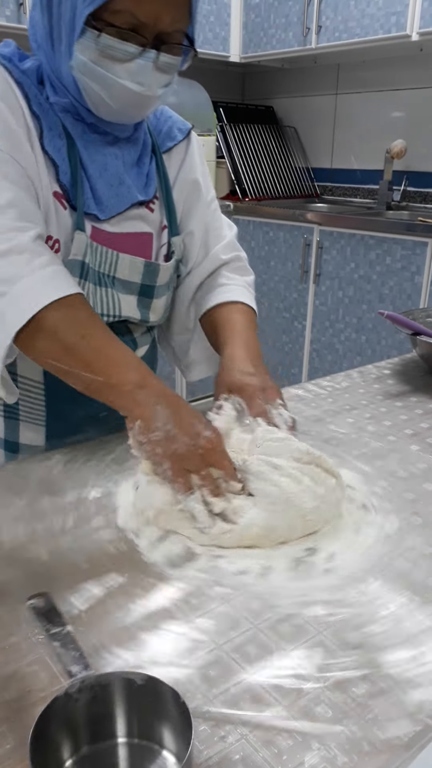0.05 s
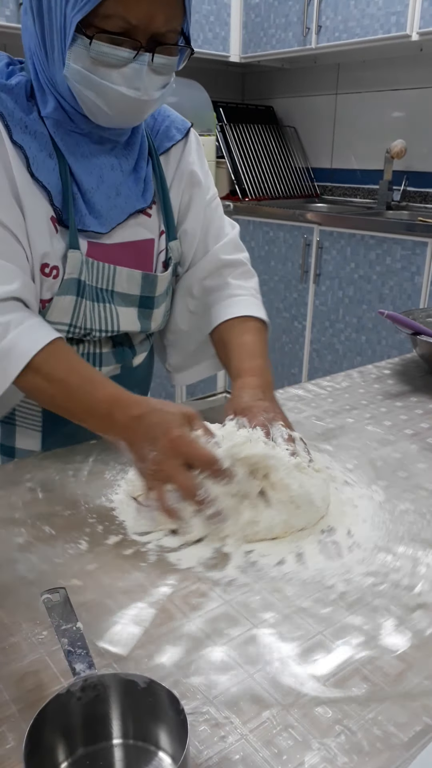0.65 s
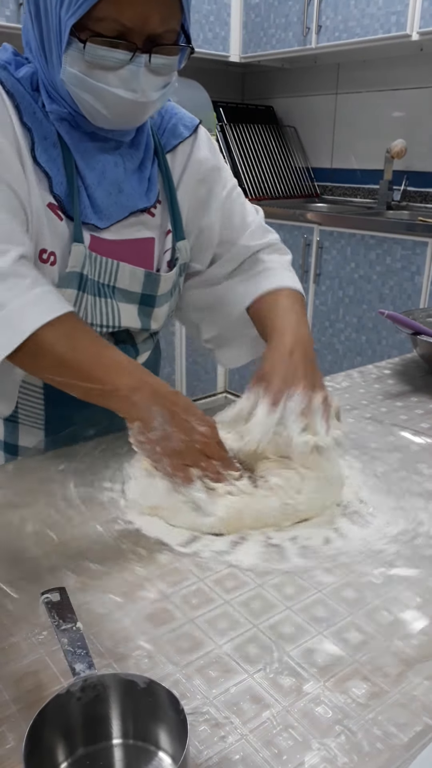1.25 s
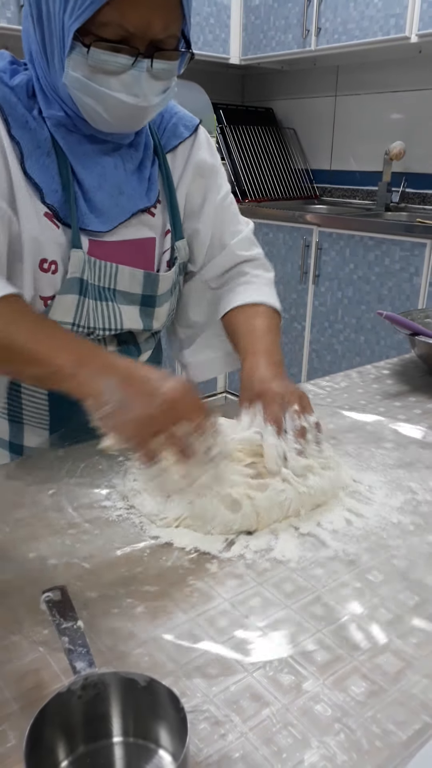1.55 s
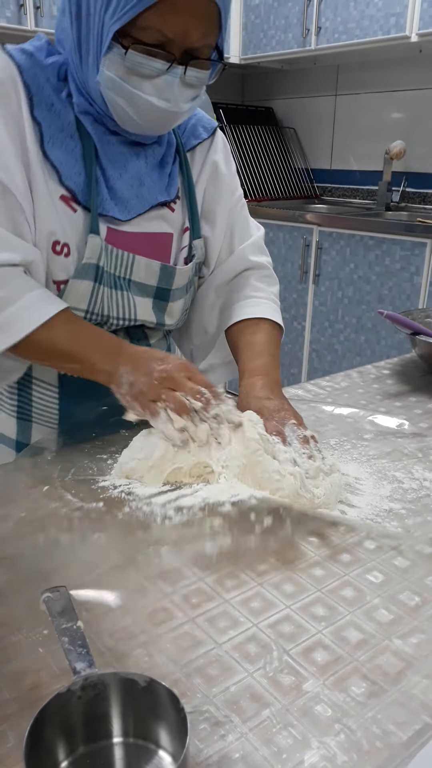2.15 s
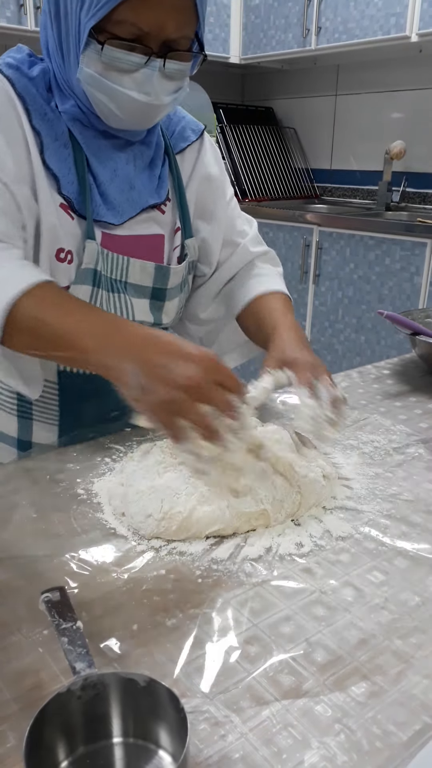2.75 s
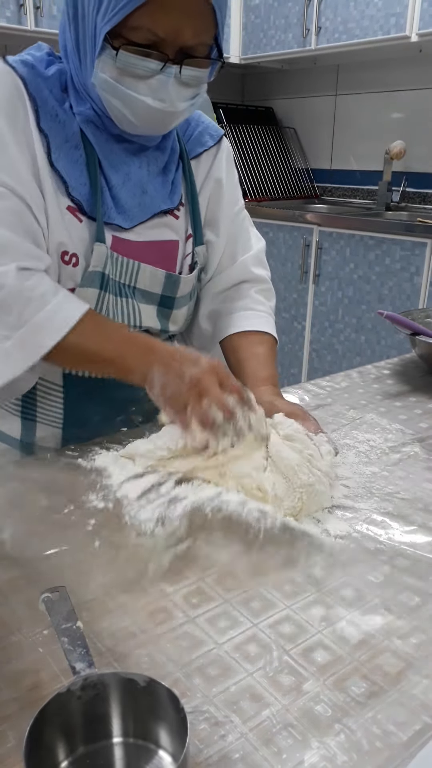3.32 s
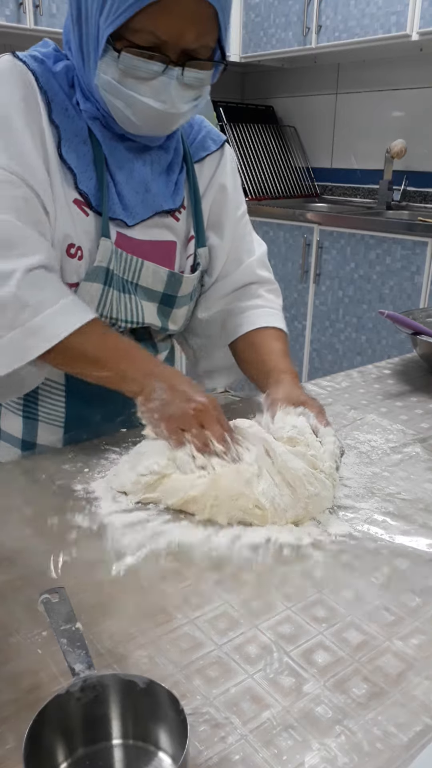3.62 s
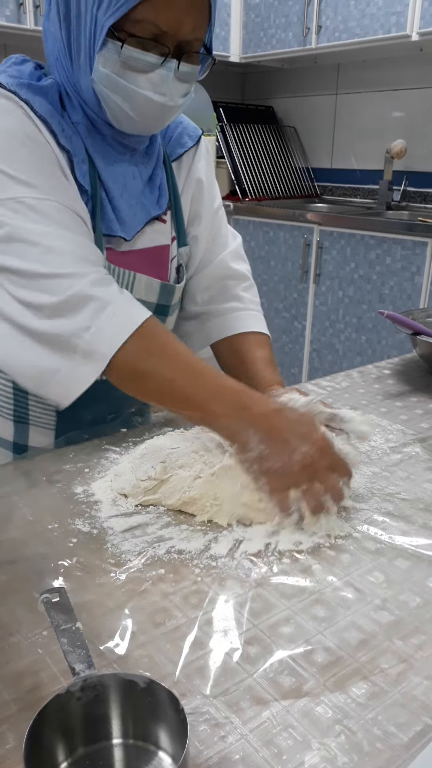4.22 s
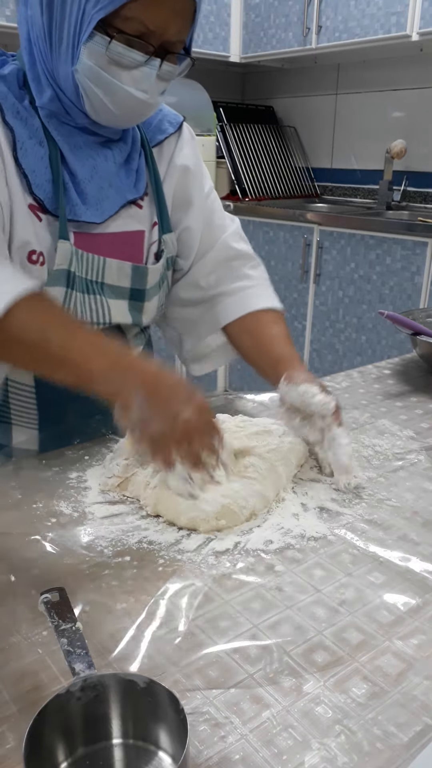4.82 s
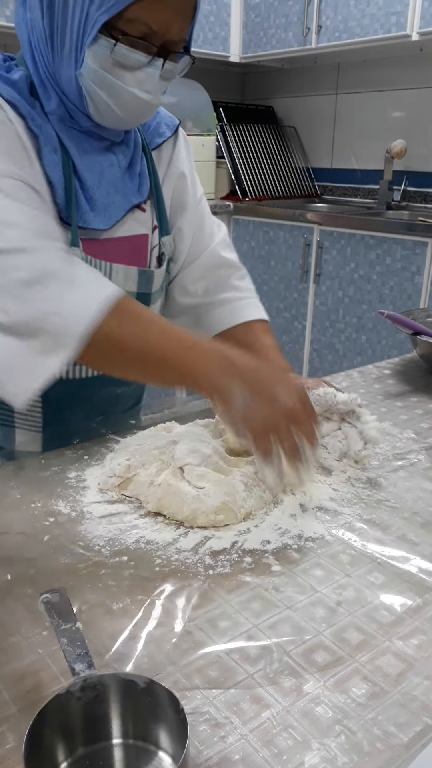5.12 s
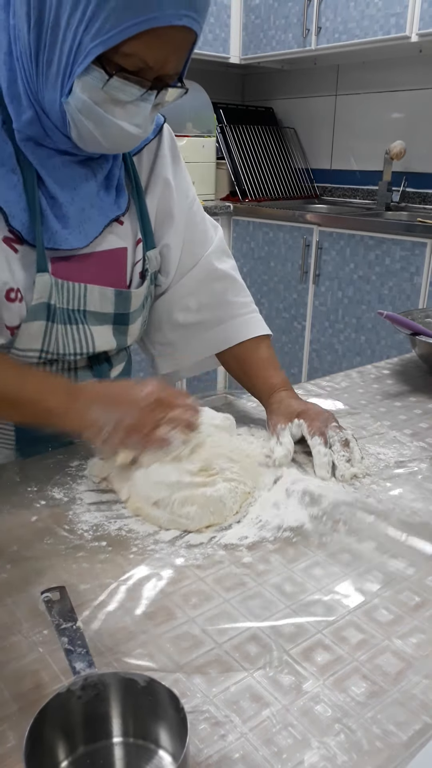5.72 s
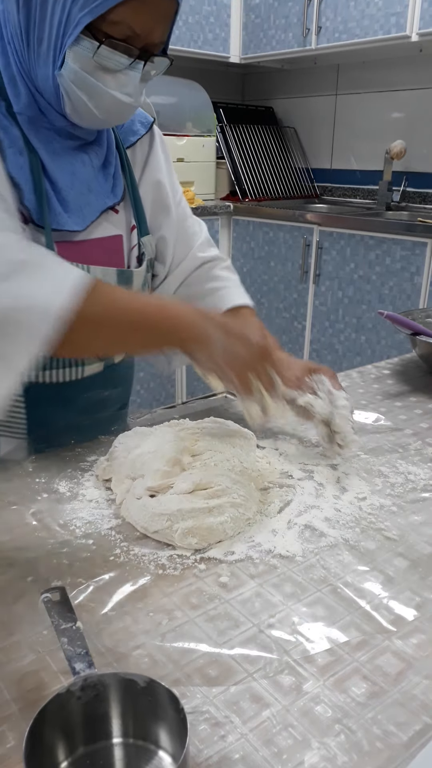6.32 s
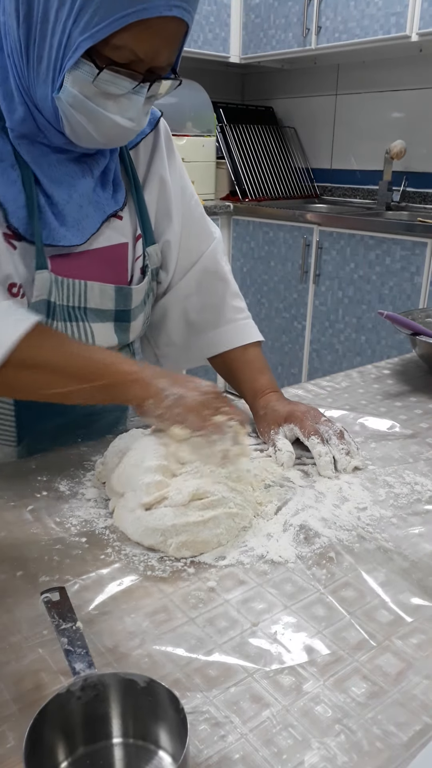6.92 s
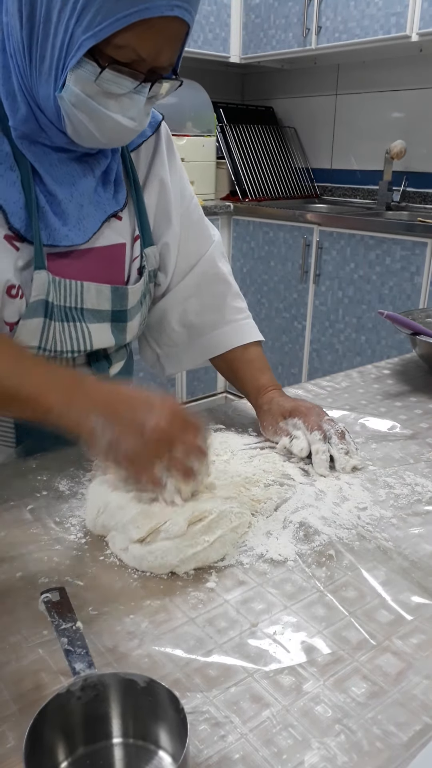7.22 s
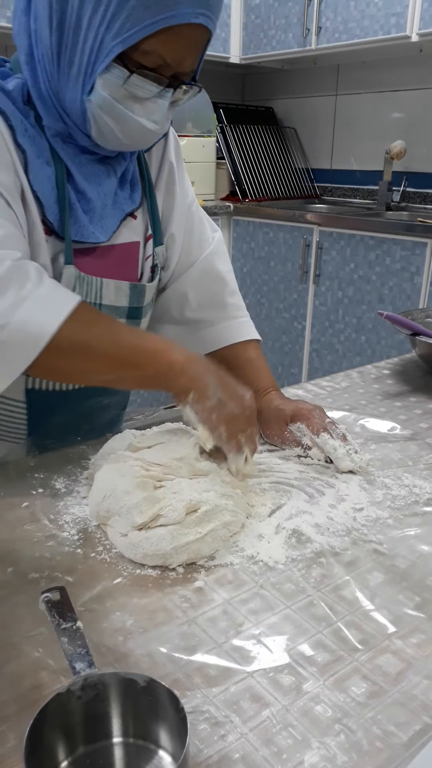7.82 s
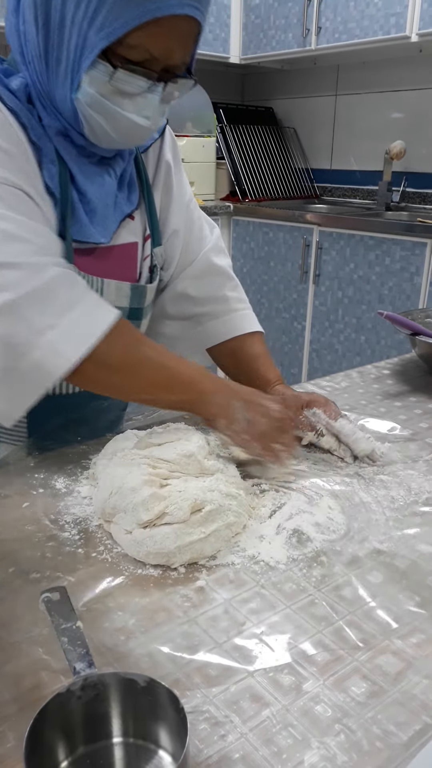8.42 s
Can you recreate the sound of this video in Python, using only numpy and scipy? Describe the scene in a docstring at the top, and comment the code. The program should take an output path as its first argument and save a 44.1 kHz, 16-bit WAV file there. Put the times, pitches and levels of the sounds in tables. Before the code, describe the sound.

Hands knead dough on a floured, plastic-covered table with soft thuds, hissing flour and occasional snaps, over a faint appliance hum.

```python
"""First come soft thuds and a hiss of flour: hands are kneading dough on a table in a tiled kitchen.
Palms and dough make the table boom, flour grains slip under the hands, and the dough bumps as it rolls.
An appliance hums behind it all. Skin sticks and slips on a loose plastic cover with short groans,
the sticky dough tears with tiny ticks, and now and then the cover lifts and snaps back."""
import sys
import numpy as np
from scipy import signal
from scipy.fft import rfft, irfft
from scipy.io import wavfile
from scipy.ndimage import uniform_filter1d

SR = 44100
rng = np.random.default_rng(int(sys.argv[2]) if len(sys.argv) > 2 else 0)


def persist_wave(psi):
    """Save psi, clipped to +-1, as 16-bit WAV."""
    counts = np.round(np.clip(psi, -1, 1) * 32767).astype(np.int16)
    wavfile.write(sys.argv[1], SR, np.atleast_2d(counts).T)


N = 377496
TIME = np.arange(N) / SR

# hand and dough landing: start_s, level_db, weight_db (bass), hardness_db (treble), spot_boom_hz
LANDINGS = [(0.001, -30, -13, -24, 118), (0.015, -22, -15.5, -23.5, 236), (0.159, -29, -18, -26, 208),
            (0.194, -30, -17.5, -27, 232), (1.036, -37, -21, -30, 320), (1.106, -35.5, -20, -34, 238),
            (1.775, -36, -14, -23, 89), (2.382, -33, -20, -35, 243), (2.42, -32.5, -22, -43, 236),
            (3.015, -26.5, -11.5, -33, 154), (4.148, -23.5, -18.5, -38, 258), (4.835, -36, -14, -28, 205),
            (5.153, -37, -21, -35, 320), (5.203, -21, -16.5, -37, 187), (5.507, -37.5, -27, -32, 325),
            (5.909, -32, -16, -30, 172), (7.592, -27.5, -14.5, -41, 171), (7.627, -34.5, -19, -25, 172),
            (7.853, -42, -28, -27, 240), (8.083, -28.5, -16.5, -31, 298)]
# how the covered table top answers a blow: frequency_hz, level_db
TABLE_TOP = [(25, -39), (60, -27.5), (150, -10.5), (230, -1), (350, -6), (490, 0.5), (630, 0), (740, -10),
             (860, -12), (1030, -21.5), (1320, -13), (2000, -24.5), (4000, -31.5), (16000, -46)]
# the low notes the table rings at: pitch_hz, level_db, fade_s (time to fall by 60 dB)
TABLE_NOTES = [(88, -1.5, 0.14), (118, 3, 0.094), (147.8, -1, 0.28), (167, 1.5, 0.053), (201.4, 3.5, 0.19),
               (240, 10.5, 0.07), (308.3, -3, 0.23), (529, 2, 0.1)]
# a hand sweeping over the flour: fastest_s, length_s, hiss_db, pressure_db (rasp compared with hiss)
HAND_SWEEPS = [(0.098, 0.31, -55, 1), (0.71, 0.23, -62, -2), (.805, 0.22, -63.5, -2),
               (0.982, 0.2, -66, -0.5), (1.295, 0.34, -59.5, 1), (1.6, 0.35, -63.5, 1.5),
               (1.864, 0.28, -64, -12), (2.084, 0.22, -68, 5), (2.52, 0.3, -56.5, 2),
               (3.12, 0.23, -65.5, -8), (3.284, 0.15, -66, 8), (4.37, 0.13, -69, 5),
               (4.613, 0.32, -71.5, 2), (4.883, 0.11, -76, 9), (5.37, 0.54, -66, 1),
               (5.833, 0.38, -73.5, 3), (5.967, 0.42, -66.5, 2), (6.628, 0.24, -65, 2),
               (6.855, .26, -70.5, 3.5), (7.665, 0.24, -64, -12), (8.232, 0.33, -57, -3)]
# a hand or the cover skidding to a stop: start_s, hiss_db, fade_s, pressure_db
SKIDS = [(0.0, -50.5, 0.15, 3), (1.785, -63.5, 0.34, 5), (2.204, -63, 0.33, 9.5), (3.014, -62.5, 0.5, 5.5),
         (3.397, -75, 0.59, 24.5), (3.712, -65, 0.17, 12), (4.141, -60.5, 0.68, 7),
         (5.201, -62.5, 0.13, 14.5), (6.505, -64.5, 0.35, 0), (7.592, -62, 0.68, 5.5),
         (8.08, -61.5, 0.3, 1), (8.292, -65, 0.33, 14), (8.359, -50, 0.46, 7.5)]
# the hiss of sliding flour: frequency_hz, level_db
FLOUR_HISS = [(1000, -18), (2500, 2.5), (3300, -2.5), (4200, -5.5), (4900, -2.5), (5900, -6), (6800, -3.5),
              (7600, -7.5), (8600, -3.5), (9800, -11), (13000, -12), (16000, -17.5)]
# the coarser rasp on the plastic: frequency_hz, level_db
PLASTIC_RASP = [(500, -2.5), (1000, -2), (1350, 12.5), (1750, 12), (2150, 8.5), (2700, -2), (3800, -3.5),
                (6000, -40)]
# palms leaning into the dough: hardest_s, length_s, level_db
PALM_PRESSES = [(0.123, 0.45, -49.5), (0.717, 0.5, -61.5), (1.4, 2.8, -61), (2.44, 0.67, -52.5),
                (3.31, 0.23, -54), (4.34, 0.59, -60), (4.88, 0.23, -54), (5.296, 0.46, -52.5),
                (5.735, .1, -51.5), (5.98, .12, -56.5), (6.606, 0.12, -41.5), (7.66, 0.23, -50),
                (8.362, 0.6, -48)]
# the appliance's dull rush of air: frequency_hz, level_db
AIR_RUSH = [(25, -28), (50, -21), (85, -7.5), (125, -12), (155, 0.5), (380, -3.5), (590, -3), (700, -7.5),
            (790, -16.5), (1050, -22.5), (1310, -13.5), (1500, -20), (2200, -26), (3200, -28)]
# its weaker whines: pitch_hz, width_hz, level_db
WEAK_WHINES = [(1294, 37, -73), (2416, 76, -79.5), (2663, 21, -79), (3830, 86, -84.5)]
# its strongest whine swelling: loudest_s, length_s, level_db
MAIN_WHINE_SWELLS = [(.5, 0.22, -71), (2.9, .3, -69), (5.92, 0.57, -69.5), (6.82, 0.4, -70.5)]
# faint background hiss, the same in both ears: frequency_hz, level_db
CENTRE_HISS = [(2500, -19), (3600, -1), (4400, -2.5), (6000, -4), (10000, -8.5), (13000, -3), (16000, -5)]
# background noise that differs between the ears: frequency_hz, level_db
SIDE_NOISE = [(25, 5), (200, -5.5), (700, 0.5), (2500, 1), (5000, 1), (9000, -10.5), (12000, -1.5),
              (15000, -1.5)]
# skin and dough sticking and slipping on the plastic: start_s, length_s, slip_rate_hz, level_db
STICKY_SLIPS = [(.163, 0.016, 367, -36.5), (.196, 0.031, 470, -40.5), (2.21, 0.013, 505, -31.5),
                (6.602, .014, 603, -35.5), (6.631, 0.02, 550, -45.5), (7.636, 0.0236, 480, -41),
                (8.09, 0.028, 490, -42.5), (8.175, 0.064, 478, -40.5)]
# sticky ticks of dough and skin: start_s, level_db, centre_hz
DOUGH_TEARS = [(1.2727, -39, 7600), (1.799, -45, 5230), (2.207, -48, 4940), (3.022, -41.5, 5960),
               (3.7116, -45.5, 4970), (4.135, -57, 6300), (4.175, -46, 4850), (4.357, -54, 6000),
               (5.21, -36, 6200), (6.4981, -59, 6500), (7.6004, -47.5, 6940), (8.085, -48, 6800),
               (8.3548, -37, 5850), (8.362, -38, 4200), (8.379, -42, 3720)]
# the cover's snaps and two of their hard echoes from the room: start_s, level_db, crispness_db (treble)
SNAPS_AND_ECHOES = [(2.048, -33.5, -15.5), (2.207, -28.5, -7.5), (3.26, -32.5, -15), (3.398, -15, -16),
                    (3.448, -33, -17), (3.497, -20, -25), (3.614, -35.5, -23), (6.567, -43, -29),
                    (6.602, -36, -27), (8.293, -31.5, -5), (8.355, -23.5, -4), (8.363, -26, 3),
                    (8.374, -38, -11), (8.381, -33, -29)]
# the hollow knock of the cover: frequency_hz, level_db
COVER_KNOCK = [(40, -59), (150, -11.5), (350, -9.5), (490, 4), (620, 8), (740, 3.5), (880, -5),
               (1020, -14.5), (1300, -2), (1900, -15.5), (2700, -22), (4000, -41), (8000, -58),
               (16000, -66)]
# tiny air pockets popping in the dough: start_s, level_db, pitch_hz
AIR_POCKETS = [(3.7116, -44.5, 2570), (4.1753, -42.5, 2540), (5.216, -45, 2370)]
# first echoes from the table and the tiled walls: delay_s, relative_gain
FIRST_ECHOES = [(.0074, 0.23), (.0092, 0.29), (.0128, 0.11), (.0195, 0.051), (.0503, 0.15)]
# how long the kitchen rings: frequency_hz, fade_s (time to fall by 60 dB)
ROOM_FADE = [(100, 0.46), (600, 0.35), (2000, 0.54), (6000, 0.65), (15000, 0.11)]


def amp(db):
    """Turns decibels into a gain to multiply by."""
    return 10 ** (np.asarray(db) / 20)


def unit(x):
    """Scales a signal to an average strength (rms) of 1."""
    return x / np.sqrt(np.mean(x ** 2) + 1e-20)


def read(points, hz):
    """Looks up a frequency in a table, blending between rows on a log scale."""
    row_hz, value = np.transpose(points)
    return np.interp(np.log(hz + 1), np.log(row_hz + 1), value)


def add(mix, s, sound):
    """Mixes a sound in at s seconds."""
    part = mix[max(round(s * SR), 0):][:len(sound)]
    part += sound[:len(part)]


def colour(x, spectrum):
    """Shapes the lows and highs of a steady signal by a table, at strength 1."""
    return unit(irfft(rfft(x) * amp(read(spectrum, np.fft.rfftfreq(N, 1 / SR))), N))


def pulse(shape_db, travel_s=0, size=4096):
    """A click with the spectrum shape_db(hz); travel_s is its delay at 500 Hz through a plate."""
    hz = np.fft.rfftfreq(size, 1 / SR)
    level_db = shape_db(abs(np.fft.fftfreq(size, 1 / SR)))
    log_gain = np.log(amp(np.maximum(level_db, -100)))
    spectrum = np.exp(np.conj(signal.hilbert(log_gain)))[:len(hz)]  # nothing sounds before the hit
    bending = np.exp(-4j * np.pi * travel_s * np.sqrt(500 * hz))  # treble travels faster than bass
    click = irfft(spectrum * bending)[:size // 2]
    return click / abs(click).max()


def blow(body, treble_db, bass_db, travel_s=0):
    """One hit on an object: short contact lifts the treble, a heavy mass the bass."""
    tilt = [(200, bass_db), (480, 0), (720, 0.0091), (1400, treble_db), (4000, 1.9 * treble_db)]
    return pulse(lambda hz: read(body, hz) + read(tilt, hz), travel_s)


def grains(per_s, spread_db):
    """Random clicks of uneven size, at strength 1."""
    size = amp(spread_db * np.minimum(rng.exponential(1, N), 4))
    return unit(size * rng.choice([-1, 1], N) * (rng.random(N) < per_s / SR))


def arch(s, length_s, end_drop_db=16, rise_share=0.47, roundness=1.48):
    """A gain that rises to 1 at time s and falls again."""
    away = np.maximum((s - TIME) / rise_share, (TIME - s) / (1 - rise_share)) / length_s
    near, gain = away < 4, np.zeros(N)
    gain[near] = amp(-end_drop_db * away[near] ** roundness)
    return gain


def skid(s, fade_s, attack_s=0.0038):
    """The gain of a sudden touch at time s that slows to a stop."""
    t, gain = np.arange(SR) / SR, np.zeros(N)
    add(gain, s, np.minimum(t / attack_s, 1) * np.exp(-np.log(1000) * t / fade_s))
    return gain


def swelling(rows, resting_db):
    """A resting gain that swells once for each row of a table."""
    swell_power = sum((amp(db) * arch(s, length_s)) ** 2 for s, length_s, db in rows)
    return np.sqrt(amp(resting_db) ** 2 + swell_power)


def table_thuds(ring_db=-12, off_spot_db=-11, spot_octaves=0.37, contact_s=0.0028):
    """Soft, heavy landings ring the table, most of all at the notes of the spot that is hit."""
    usual_weight_db, usual_hardness_db = -15, -22
    out, t = np.zeros(N), np.arange(SR // 2) / SR
    notes = np.array([(-1) ** k * amp(db - 60 * t / fade_s) * np.sin(2 * np.pi * hz * t)
                      for k, (hz, db, fade_s) in enumerate(TABLE_NOTES)])
    notes *= 1 - np.exp(-t / contact_s)  # soft dough builds its force slowly
    note_hz = np.array(TABLE_NOTES)[:, 0]
    for s, db, weight_db, hardness_db, spot_hz in LANDINGS:
        bass_db = weight_db - usual_weight_db
        near = np.exp(-(np.log2(note_hz / spot_hz) / spot_octaves) ** 2)
        ring = amp(off_spot_db * (1 - near)) @ notes
        knock = blow(TABLE_TOP, hardness_db - usual_hardness_db, bass_db, travel_s=0.001865)
        add(out, s, amp(db) * knock)
        add(out, s, amp(db + ring_db + min(bass_db, 2)) * ring)  # heavier rings louder, up to a limit
    return out


def sliding_flour(resting_hiss_db=-80, resting_rasp_db=-75):
    """Countless flour grains slip under the hands; pressure adds a coarser rasp on the plastic."""
    moves = [(amp(db) * arch(s, length_s), pressure_db) for s, length_s, db, pressure_db in HAND_SWEEPS]
    moves += [(amp(db) * skid(s, fade_s), pressure_db) for s, db, fade_s, pressure_db in SKIDS]
    hiss_power = amp(resting_hiss_db) ** 2 + sum(gain ** 2 for gain, _ in moves)
    rasp_power = amp(resting_rasp_db) ** 2 + sum((gain * amp(db)) ** 2 for gain, db in moves)
    hiss = colour(grains(per_s=7600, spread_db=2.5), FLOUR_HISS)
    rasp = colour(grains(per_s=1900, spread_db=3), PLASTIC_RASP)
    return np.sqrt(hiss_power) * hiss + np.sqrt(rasp_power) * rasp


def rolling_dough():
    """Many small soft bumps as the dough rolls over folds in the cover, louder under each press."""
    bump = blow(TABLE_TOP, treble_db=-8, bass_db=-1)
    bumps = signal.oaconvolve(grains(per_s=260, spread_db=4.0), bump)[:N]
    return swelling(PALM_PRESSES, resting_db=-69) * unit(bumps)


def whine(hz, width_hz):
    """A tone that wavers at random within its width, at strength 1."""
    smoothing = signal.butter(2, width_hz / 2, fs=SR, output="sos")
    waver = signal.sosfilt(smoothing, rng.standard_normal((2, N)))
    return unit(((waver[0] + 1j * waver[1]) * np.exp(2j * np.pi * hz * TIME)).real)


def motor_tone(hz, wander_hz):
    """A tone of steady strength 1 whose pitch wanders a little."""
    wander = unit(uniform_filter1d(rng.standard_normal(N), size=SR // 20))
    return unit(np.sin(2 * np.pi * np.cumsum(hz + wander_hz * wander) / SR))


def appliance(rush_db=-55, main_hz=2927, fuzz_db=-1.5):
    """A distant appliance: a dull rush of air and thin wavering whines."""
    hum = amp(rush_db) * colour(rng.standard_normal(N), AIR_RUSH + [(4500, -38), (9000, -99)])
    hum += sum(amp(db) * whine(hz, width_hz) for hz, width_hz, db in WEAK_WHINES)
    main_whine = motor_tone(main_hz, wander_hz=7.08) + amp(fuzz_db) * whine(main_hz, width_hz=210)
    return hum + swelling(MAIN_WHINE_SWELLS, resting_db=-72) * unit(main_whine)


def background_noise(hiss_db=-74.5, side_db=-77):
    """A faint hiss, plus faint noise that differs between the ears."""
    hiss = amp(hiss_db) * colour(rng.standard_normal(N), CENTRE_HISS)
    side = amp(side_db) * colour(rng.standard_normal(N), SIDE_NOISE)
    return hiss + side * np.array([[1], [-1]])  # added on the left, taken away on the right


def palm_groans(jitter=0.097, overtone_db=-17):
    """A sticking palm slips a few hundred times a second, close to the table top's hollow note."""
    out = np.zeros(N)
    for s, length_s, hz, db in STICKY_SLIPS:
        size = round(length_s * SR)
        uneven = unit(uniform_filter1d(rng.standard_normal(SR // 4), size=60))[:size]
        angle = 2 * np.pi * np.cumsum(hz * (1 + jitter * uneven)) / SR
        tone = np.sin(angle) + amp(overtone_db) * np.sin(2 * angle)
        add(out, s, amp(db) * tone * signal.windows.tukey(size, .5))
    return out


def dough_ticks(tear_s=0.0014, octave_drop_db=13):
    """Each tick is a tiny tear in the sticky dough: a very short burst of high noise."""
    out, t = np.zeros(N), np.arange(SR // 50) / SR
    for s, db, centre_hz in DOUGH_TEARS:
        tear = rng.standard_normal(len(t)) * t / tear_s * np.exp(-2 * t / tear_s)
        click = pulse(lambda hz: -octave_drop_db * np.log2((hz + 1) / centre_hz) ** 2)
        tick = signal.fftconvolve(tear, click)
        add(out, s, amp(db) * tick / abs(tick).max())
    return out


def cover_snaps(usual_crispness_db=-12):
    """The light cover's snaps, and two of their echoes, are hollow knocks with little bass."""
    out = np.zeros(N)
    for s, db, crispness_db in SNAPS_AND_ECHOES:
        knock = blow(COVER_KNOCK, crispness_db - usual_crispness_db, bass_db=0, travel_s=0.000995)
        add(out, s, amp(db) * knock)
    return out


def air_pops(decay_s=0.0011):
    """An air pocket in the dough rings briefly as it opens."""
    out, t = np.zeros(N), np.arange(SR // 50) / SR
    rise_and_fall = t / decay_s * np.exp(1 - t / decay_s)
    for s, db, hz in AIR_POCKETS:
        add(out, s, amp(db) * rise_and_fall * np.sin(2 * np.pi * hz * t))
    return out


def kitchen(x, tail_db, echo_db, build_s=0.0039):
    """The sound itself, a few hard echoes and a fading wash of many more, alike in both ears."""
    size = SR * 2 // 3
    hz, t, noise = signal.stft(rng.standard_normal(size), SR, nperseg=256)
    fade = amp(-60 * t / read(ROOM_FADE, hz)[:, None])
    tail = signal.istft(noise * fade, SR)[1][:size]
    tail *= 1 - np.exp(-(np.arange(size) / SR / build_s) ** 2)
    room = amp(tail_db) * tail / np.linalg.norm(tail)
    room[0] += 1  # the direct sound
    for delay_s, gain in FIRST_ECHOES:
        add(room, delay_s, np.array([amp(echo_db) * gain]))
    return signal.oaconvolve(x, room)[:N]


def scene():
    """The kneading echoes through the kitchen, over the appliance and faint noise."""
    table = kitchen(table_thuds() + rolling_dough() + palm_groans(), tail_db=-5.5, echo_db=-4.5)
    cover = kitchen(cover_snaps(), tail_db=-7.5, echo_db=0.5)
    hands = kitchen(dough_ticks() + air_pops() + sliding_flour(), tail_db=-11, echo_db=-8.0)
    return table + cover + hands + appliance() + background_noise()


def record(dry, cutoff_hz=15900):
    """Cuts away the very highest treble."""
    low_pass = signal.firwin(511, cutoff_hz, window=("kaiser", 9), fs=SR)
    return signal.oaconvolve(dry, low_pass[None], "same")


dry = scene()
out = record(dry)
persist_wave(out)
```